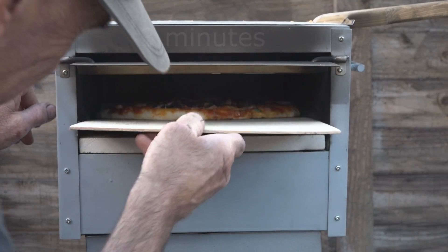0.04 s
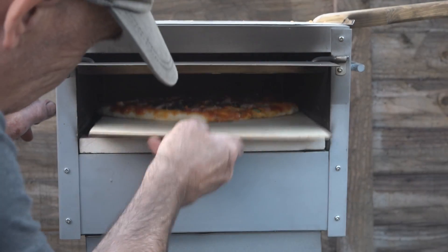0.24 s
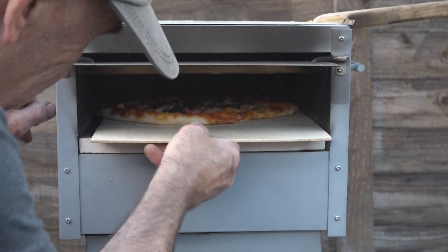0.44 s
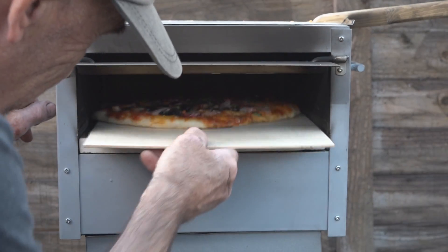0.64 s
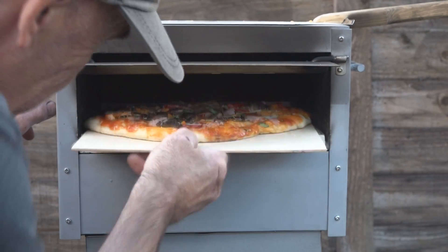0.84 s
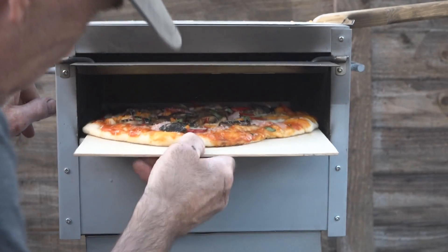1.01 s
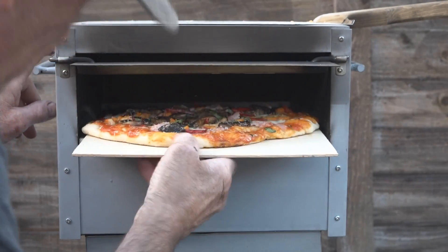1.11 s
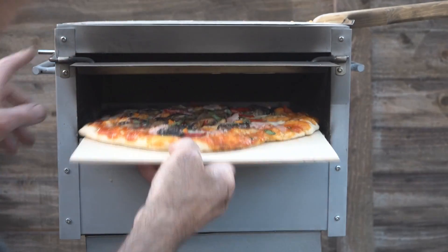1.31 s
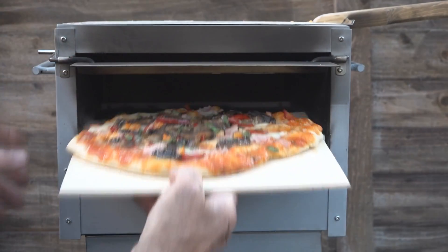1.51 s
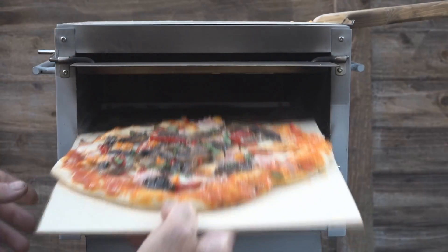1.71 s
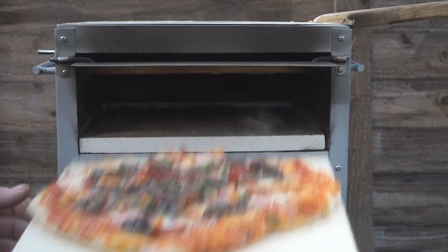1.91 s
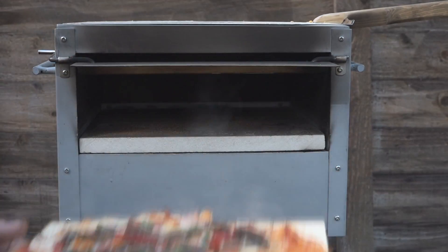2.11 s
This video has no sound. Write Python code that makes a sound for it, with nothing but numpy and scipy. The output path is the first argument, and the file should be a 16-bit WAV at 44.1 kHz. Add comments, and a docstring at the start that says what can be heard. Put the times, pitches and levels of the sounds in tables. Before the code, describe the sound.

A flat board scrapes across the floor of a small steel oven, ending in a knock at 0.3 seconds. A longer scrape swells to a louder, hollow knock at 1 second. After a sharp click near 1.4 seconds, the board drags over the lip with gritty snags and bumps, swishing clear at 2 seconds. A low outdoor hum continues, with very faint steam whistles at the start and end.

```python
"""Over a low outdoor hum, a hot pizza whistles faintly with steam in a small steel oven.
A flat board is shoved under it in two strokes, each a scrape of tiny frictional slips ending in a knock.
The board is then dragged out over the front lip, where it snags, bumps a few times and rasps.
At last it swishes clear as the steam whistles again. Throughout, friction and impact excite
the modes of board and oven floor, and the chamber and its shell reverberate."""
import sys
import numpy as np
from scipy import signal
from scipy.fft import rfft, irfft, next_fast_len
from scipy.io import wavfile
from scipy.ndimage import uniform_filter1d

SR = 44100
rng = np.random.default_rng(int(sys.argv[2]) if len(sys.argv) > 2 else 0)


def master_out(mix):
    """Clip the mix to full scale and print it as 16-bit PCM to the path in sys.argv[1]."""
    frames = np.transpose(np.atleast_2d(mix))
    ceiling = np.clip(frames, -1, 1)
    pcm = np.round(ceiling * 32767).astype(np.int16)
    wavfile.write(sys.argv[1], SR, pcm)


N = 94815
TIME = np.arange(N) / SR

# Spectrum of the board on the lip. Each row: frequency in Hz, relative gain in dB.
LIP_SPECTRUM = [(50, -50), (250, -20), (400, 2.5), (700, -2.5), (1050, 0.5), (1600, 1), (2400, -2.5),
                (3200, -3), (5000, -1.5), (8500, -4), (15000, -16)]


def from_db(db):
    """The logarithmic level scale: 20 dB is a factor of ten in amplitude."""
    return 10 ** (np.asarray(db) / 20)


def rms_one(x):
    """Normalisation to unit mean power."""
    return x / np.sqrt(np.mean(x ** 2) + 1e-20)


def cut(x, hz, kind, order=2):
    """Butterworth filtering, low-pass or high-pass."""
    sections = signal.butter(order, np.clip(hz, 10, .45 * SR), kind, fs=SR, output="sos")
    return signal.sosfilt(sections, x + 1e-18)


def colour(x, spectrum):
    """Minimum-phase filtering to a given spectrum; white noise keeps its power."""
    size = next_fast_len(2 * N, True) // 2 * 2
    hz, db = np.transpose(spectrum)
    bin_hz = np.arange(size // 2 + 1) * SR / size
    gain = rms_one(from_db(np.interp(np.log(bin_hz + 1), np.log(hz), db)))
    cepstrum = irfft(np.log(gain))
    cepstrum[1:size // 2] *= 2  # folding onto positive time makes the filter causal
    cepstrum[size // 2 + 1:] = 0
    return irfft(rfft(x, size) * np.exp(rfft(cepstrum)))[:N]


def drift(hz):
    """Random fluctuation: low-passed noise of unit power."""
    return rms_one(cut(rng.standard_normal(N + SR), hz, "low")[SR:])


def decay(start, t60):
    """Exponential damping: a sudden onset, then a fall of 60 dB every t60 seconds."""
    return (TIME >= start) * from_db(-60 * np.maximum(TIME - start, 0) / t60)


def narrow_band(hz, width_hz):
    """Random amplitude modulation spreads a gliding tone into a rough band."""
    return np.sqrt(2) * np.sin(2 * np.pi * np.cumsum(hz) / SR) * drift(width_hz)


def crowded_modes(spectrum):
    """Modal overlap: many close modes beat together as noise, held at an even level."""
    x = colour(rng.standard_normal(N), spectrum)
    return x / np.sqrt(uniform_filter1d(x * x, size=700) + 1e-12)


def reverberate(x, t60, dull_hz):
    """Diffuse reverberation: dense, dull reflections die away exponentially."""
    tail = rng.standard_normal(N) * decay(0.00047, t60)
    return signal.fftconvolve(x, cut(tail / np.linalg.norm(tail), dull_hz, "low"))[:N]


def place(x, pan_db):
    """A left-minus-right level difference gives direction; the yard's side reflections give width."""
    sides = np.array([[1], [-1]])
    reflections = from_db(-33) * reverberate(x, t60=0.092, dull_hz=12000)
    return x * from_db(sides * pan_db / 2) + sides * reflections


def outdoor_hum():
    """Steady ambient noise with its power concentrated at low frequencies."""
    # Each row: frequency in Hz, relative gain in dB.
    spectrum = [(30, -32), (55, -30), (85, -11), (120, 0), (165, 3.5), (210, -7.5), (280, -2), (450, -1),
                (620, -9), (1000, -13), (2000, -22), (4000, -22), (8000, -24), (15000, -29)]
    return from_db(-46.5) * colour(rng.standard_normal(N), spectrum)


def steam_whistles():
    """Flow tones: steam leaks from the hot topping in thin, wavering glides."""
    # Each row: start and end in seconds, first and last frequency in Hz, level in dB.
    whistles = [(0, .64, 12750, 13200, -68), (1.75, 2.15, 12700, 13500, -65), (1.74, 2.17, 8650, 7700, -60)]
    out, waver_hz = 0, 60
    for start, end, from_hz, to_hz, db in whistles:
        hz = np.interp(TIME, [start, end], [from_hz, to_hz]) + waver_hz * drift(310)
        gate = np.clip(np.minimum(TIME - start, end - TIME) / 0.023, 0, 1)
        out = out + from_db(db) * gate * np.sin(2 * np.pi * np.cumsum(hz) / SR)
    return out


def ticks():
    """Broadband transients: tiny bright ticks in the first 0.2 s, then one sharp, dry click at 1.37 s."""
    # Each row: start in seconds, level in dB.
    onsets = [(.0822, -38), (.0872, -33), (.1058, -37), (.1845, -38), (1.3663, -27.5)]
    # Each row: frequency in Hz, relative gain in dB.
    spectrum = [(500, -17), (3000, 3.5), (6000, -4.5), (8500, 2), (12000, -7.5), (16000, 5)]
    envelope = sum(from_db(db) * decay(start, t60=.009) for start, db in onsets)
    return colour(rng.standard_normal(N) * envelope, spectrum)


def slips(per_s, spread_db, max_db):
    """Shot noise: tiny slips come as impulses of random time, sign and size."""
    sizes = from_db(np.minimum(spread_db * rng.exponential(1, N), max_db)) * rng.choice([-1, 1], N)
    return rms_one(sizes * (rng.random(N) < per_s / SR))


def friction():
    """Stick-slip friction: dense slips over a smooth rub, juddering as the board catches."""
    rub = slips(per_s=8000, spread_db=2.5, max_db=10) + 0.75 * rng.standard_normal(N)
    judder_db = 1.05 * drift(hz=125)
    return rms_one(rub * from_db(judder_db))


def grit():
    """Granular friction: crumbs crushed on the lip give fewer, more uneven slips."""
    return rms_one(slips(per_s=1800, spread_db=4, max_db=12) + .5 * rng.standard_normal(N))


def rubs(rows, spectrum):
    """Friction noise under envelopes that rise, hold and decay exponentially."""
    envelope = 0
    for start, rise, hold, t60, db in rows:
        release = start + rise + hold
        attack = np.clip((TIME - start) / rise, 0, 1)
        envelope = envelope + from_db(db) * attack * ((TIME < release) + decay(release, t60))
    return colour(friction() * envelope, spectrum)


def edge_rasp():
    """A narrow resonance of the board's edge glides with the contact point as it leaves the lip."""
    # Each row: time in seconds, frequency in Hz, relative level in dB.
    glide = [(1.675, 4100, -54), (1.708, 4200, -42), (1.738, 5260, -36.5), (1.773, 4980, -43),
             (1.79, 4900, -62)]
    times, hz, db = np.transpose(glide)
    envelope = from_db(np.interp(TIME, times, db, left=-120, right=-120))
    return narrow_band(np.interp(TIME, times, hz), width_hz=230) * envelope


def singing():
    """Friction-excited vibration gathers in bands that swell, glide and fade as the board moves."""
    # Each row: start and end in seconds, first and last centre and width in Hz, relative level in dB.
    bands = [(0.222, 0.297, 930, 1014, 60, -24.5), (0.76, 0.96, 372, 398, 48, -37),
             (0.772, 0.926, 8200, 5970, 700, -34.5), (0.81, 0.94, 1559, 1438, 210, -28.5),
             (1.594, 1.642, 1690, 1533, 112, -40.5), (1.956, 2.03, 2600, 2750, 250, -38),
             (2.05, 2.213, 3150, 3800, 304, -52)]
    out = 0
    for start, end, from_hz, to_hz, width_hz, db in bands:
        progress = np.clip((TIME - start) / (end - start), 0, 1)
        hz = from_hz + (to_hz - from_hz) * progress
        out = out + from_db(db) * np.sin(np.pi * progress) * narrow_band(hz, width_hz)
    return out


def lip_snags():
    """Stick and release: the board catches on the lip and lets go in a gritty burst."""
    # Each row: start in seconds, relative level in dB, t60 in seconds.
    snags = [(1.39, -39, 0.059), (1.447, -33.5, 0.066), (1.531, -35, 0.062), (1.547, -30.5, 0.034),
             (1.605, -52, 0.036), (1.6167, -36.5, 0.072)]
    envelope = sum(from_db(db) * decay(start, t60) for start, db, t60 in snags)
    return colour(grit() * envelope, LIP_SPECTRUM)


def brief_contacts():
    """The manner of contact shapes the spectrum of friction: a swish, a grind or a scuff."""
    # Each row: start, rise, hold and t60 in seconds, relative level in dB.
    swishes = [(.89, 0.033, 0.058, 0.045, -19.5), (1.959, 0.011, 0.034, 0.32, -33.5)]  # the face slides flat, brightly
    grinds = [(.445, 0.018, 0.031, 0.56, -45), (1.09, 0.04, 0.027, 0.071, -39.5),
              (1.385, 0.034, 0.085, 0.18, -37), (1.56, 0.0019, 0.0092, 0.5, -41.5)]  # pressed down, the board sounds hollow
    scuffs = [(1.734, 0.012, 0.0052, 0.11, -25.5), (1.834, 0.0022, 0.021, 0.18, -38.5)]  # the edge rubs the front lip
    # Each row: frequency in Hz, relative gain in dB.
    swish_spectrum = [(300, -19), (700, -3), (1400, -3.5), (2700, -1.5), (4200, 0.5), (6000, -2.5),
                      (8500, -5.5), (15000, -21)]
    grind_spectrum = [(60, -48), (250, -12), (400, 0), (540, 0), (700, -2.5), (1000, -11), (2000, -20),
                      (8000, -42)]
    scuff_spectrum = [(100, -44), (260, -0.5), (365, 4.5), (520, -4), (800, 1.5), (1150, 2.5), (2000, -6),
                      (3200, -15), (8000, -16), (15000, -23)]
    return rubs(swishes, swish_spectrum) + rubs(grinds, grind_spectrum) + rubs(scuffs, scuff_spectrum)


def stroke(excitation, levels, spectrum):
    """Source and filter: slip noise follows a level contour, then takes on a spectrum."""
    db = np.interp(TIME, *np.transpose(levels), left=-100, right=-100)
    return colour(excitation * from_db(db), spectrum)


def scrapes():
    """Sliding friction: two shoves over the oven floor, then a gritty drag over the lip."""
    # Each row: time in seconds, relative level in dB.
    first_shove = [(0, -28.5), (.03, -42.5), (.075, -50.5), (.14, -50), (.178, -55), (.197, -39),
                   (.208, -23), (.245, -13.5), (.278, -14), (0.289, -19), (0.306, -19), (0.321, -29),
                   (.355, -33.5), (.41, -53), (0.492, -43), (.52, -72)]
    second_shove = [(.59, -57.5), (0.659, -43), (.755, -38), (.8, -30.5), (.845, -26.5), (.89, -26),
                    (.94, -21), (.98, -32), (.991, -32), (1.07, -35.5), (1.115, -34.5), (1.18, -41.5),
                    (1.25, -47), (1.33, -55)]
    drag_out = [(1.376, -50.5), (1.397, -39), (1.45, -40), (1.507, -38), (1.519, -43.5), (1.533, -33.5),
                (1.562, -40), (1.577, -27.5), (1.597, -40), (1.626, -30.5), (1.66, -42), (1.72, -35),
                (1.75, -37), (1.785, -48), (1.82, -49)]
    # Each row: frequency in Hz, relative gain in dB.
    first_spectrum = [(50, -68), (140, -39), (250, -18), (390, -10.5), (620, -4.5), (800, -2.5),
                      (1000, -1.5), (1500, -1), (2700, -7), (4000, -8.5), (5200, -12), (8600, -6.5),
                      (11000, -12.5), (15000, -18)]
    second_spectrum = [(50, -33), (160, -20.5), (285, -14), (350, -5.5), (440, -4.5), (620, -1.5),
                       (1000, -9), (1600, -9), (2300, -9.5), (4800, -13.5), (7000, -13.5), (9000, -12),
                       (15000, -21.5)]
    return (stroke(friction(), first_shove, first_spectrum)
            + stroke(friction(), second_shove, second_spectrum)
            + stroke(grit(), drag_out, LIP_SPECTRUM))


def knocks():
    """Impact excitation: a crack, chatter, a thump of the oven body and a clunk of board and floor."""
    # Each row: start in seconds, crack level in dB, treble cutoff in Hz, thump and clunk levels in dB,
    # their t60 in seconds, chatter level in dB, its t60 in seconds. Levels are relative.
    impacts = [(0.2985, -10.5, 895, -27.5, -28, 0.17, -23.5, 0.12),
               (0.304, -9.5, 2130, -35.5, -39, 0.29, -14.5, 0.034),
               (.976, 5.5, 4500, -23.5, -15.5, 0.21, -18.5, 0.02),
               (1.5005, -25, 6000, -63, -41, .12, -38, .025),
               (1.5738, -15, 11000, -71, -43, .15, -24, 0.022),
               (1.835, -41, 7000, -46, -34, 0.21, -39, 0.24), (1.918, -49, 695, -36, -47, 0.077, -45, 0.07)]
    # Each row: frequency in Hz, relative gain in dB.
    thump_spectrum = [(40, -26), (80, -30), (120, 9), (165, -4.5), (225, 11), (290, 5), (400, 3),
                      (800, -37)]
    clunk_spectrum = [(100, -9.5), (270, -29.5), (400, -4.5), (520, -7.5), (620, 8), (790, -10),
                      (1050, -12), (2500, -78)]
    out, thump_envelope, clunk_envelope = 0, 0, 0
    rub = cut(friction(), 405, "high")
    for start, crack_db, dull_hz, thump_db, clunk_db, body_t60, chatter_db, chatter_t60 in impacts:
        impulse = 1. * (np.arange(N) == int(start * SR))
        crack = cut(cut(impulse, dull_hz, "low", order=4), 610, "high")
        chatter = rms_one(cut(rub, dull_hz, "low", order=1)) * decay(start, chatter_t60)
        out = out + from_db(crack_db) * crack / np.abs(crack).max() + from_db(chatter_db) * chatter
        thump_envelope = thump_envelope + from_db(thump_db) * decay(start, body_t60)
        clunk_envelope = clunk_envelope + from_db(clunk_db) * decay(start, body_t60)
    thumps = cut(thump_envelope, 115, "low") * crowded_modes(thump_spectrum)
    clunks = cut(clunk_envelope, 240, "low") * crowded_modes(clunk_spectrum)
    return out + thumps + clunks


def board_modes(contact):
    """Modal resonance of board and floor; where the board rests sets how hard each mode is driven."""
    # Each row: frequency in Hz, gain in dB with the board inside and over the lip, t60 in seconds.
    modes = [(244.9, 4.5, -12, 1.8), (349, -2.5, -19, 0.085), (378, -1, 1.5, 0.12), (406, 8, -1.5, 0.11),
             (531.5, -3, 0, 0.12), (729.6, -2.5, 1, 0.12), (817, 1, -3, 0.43), (958, -1, -6, 0.05),
             (1124, -1, -9, 0.091), (1375, -20, 7, 0.11), (1550, 1, 3, 0.07), (1885, -3, -6, 0.13),
             (1990, -13, 2, 0.08), (2745, -15, 9.5, 0.07), (3560, -1.5, -10, 0.033), (4023, -0.5, 1, 0.035),
             (9000, 3, -11, 0.084)]
    out, over_lip_s = 0, 1.37
    for hz, inside_db, lip_db, t60 in modes:
        radius = from_db(-60 / (t60 * SR))
        numerator = (1 - radius ** 2) / 2 * np.array([1, 0, -1])
        denominator = [1, -2 * radius * np.cos(2 * np.pi * hz / SR), radius ** 2]
        drive = contact * from_db(np.where(TIME < over_lip_s, inside_db, lip_db))
        out = out + signal.lfilter(numerator, denominator, drive)
    return out


def scene():
    """Superposition: the contacts ring board, chamber and steel shell over the hum and the steam."""
    # The board's direction. Each row: time in seconds, left minus right level in dB.
    pan = [(0, -4), (.3, -5.5), (.85, -5.5), (.98, -3.5), (1.06, -7), (1.5, -4.5), (2.1, -2.5)]
    contact = scrapes() + brief_contacts() + lip_snags() + edge_rasp() + singing() + knocks()
    contact *= from_db(-2)
    board = cut(contact + board_modes(contact), 80, "high", order=4)
    chamber = from_db(-9.5) * reverberate(board, t60=0.29, dull_hz=7000)
    shell = from_db(-4) * reverberate(board, t60=0.65, dull_hz=214)
    hum = outdoor_hum()
    oven = place(board + chamber + shell + ticks(), np.interp(TIME, *np.transpose(pan)))
    return oven + place(hum + steam_whistles(), pan_db=-4.5)


def record(dry):
    """Clipping and band limiting: peaks flatten at full scale and the top is cut at 16 kHz."""
    low_pass = signal.ellip(10, .05, 50, 16000, fs=SR, output="sos")
    return signal.sosfiltfilt(low_pass, np.clip(dry, -1, 1))


dry = scene()
out = record(dry)
master_out(out)
```